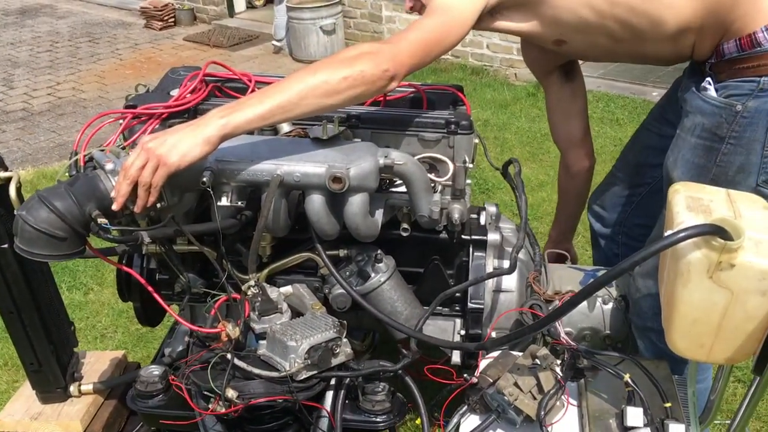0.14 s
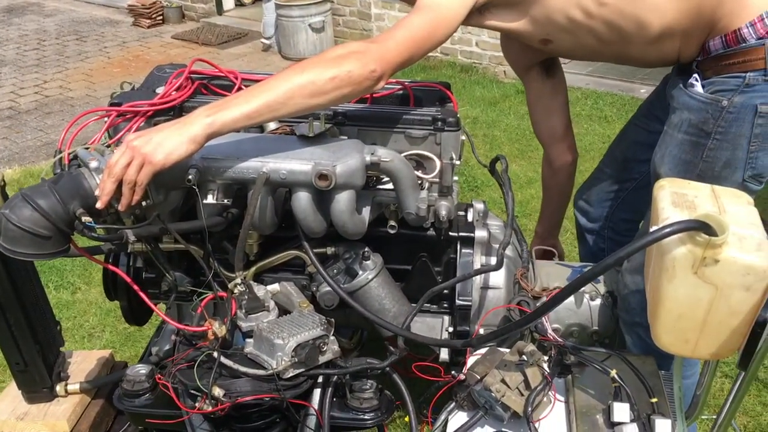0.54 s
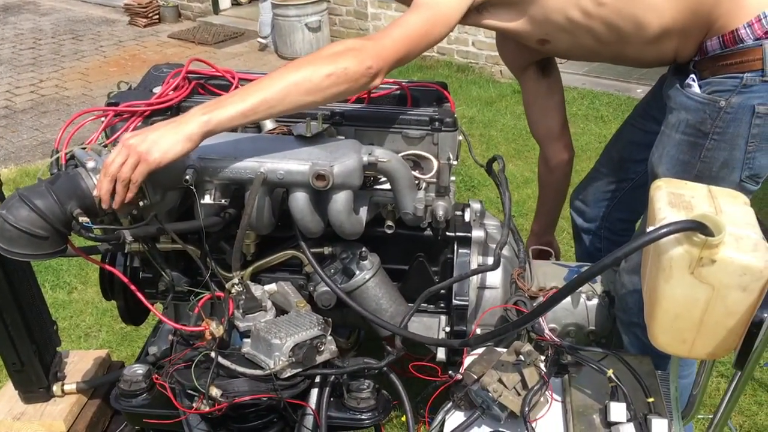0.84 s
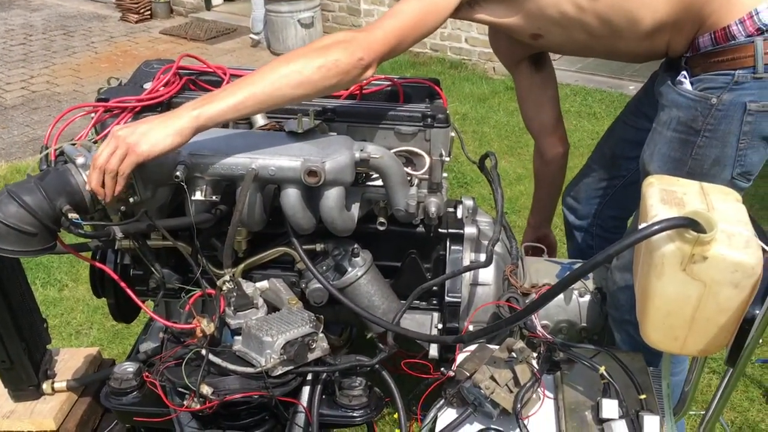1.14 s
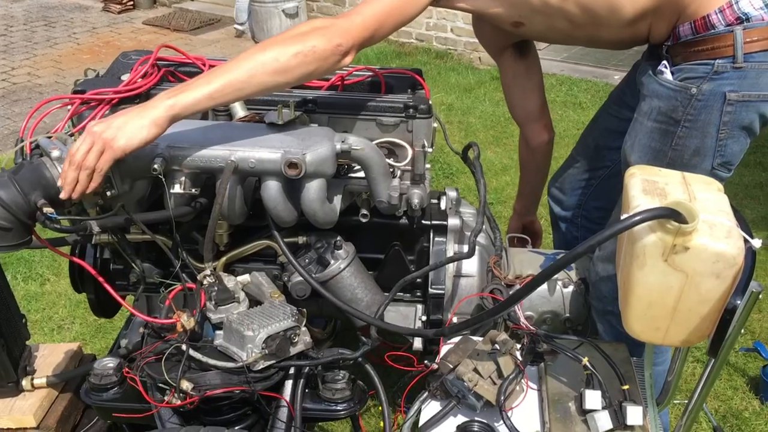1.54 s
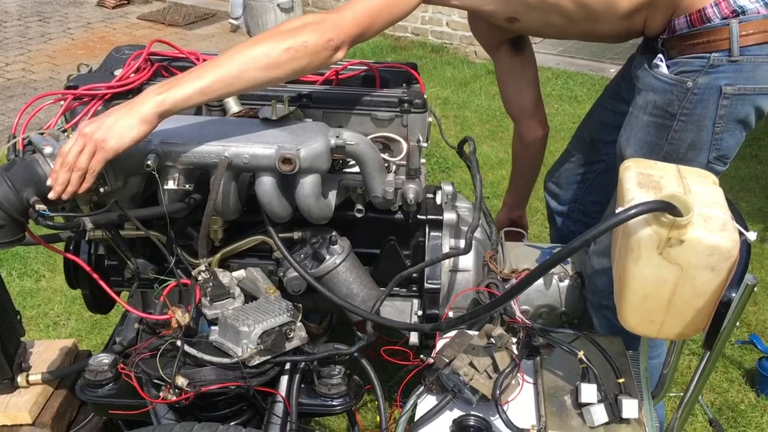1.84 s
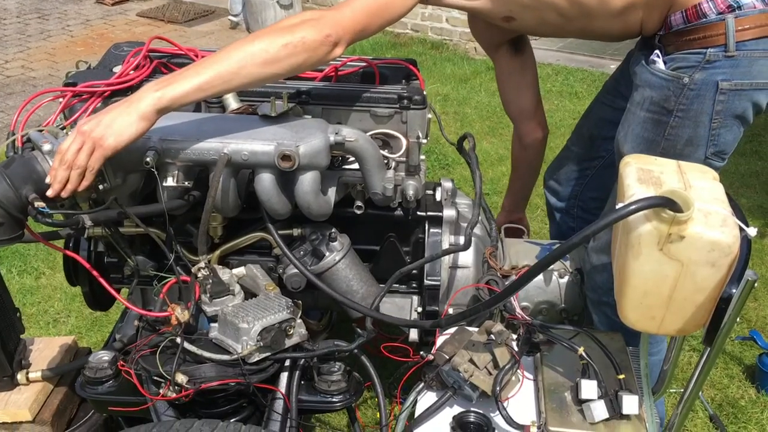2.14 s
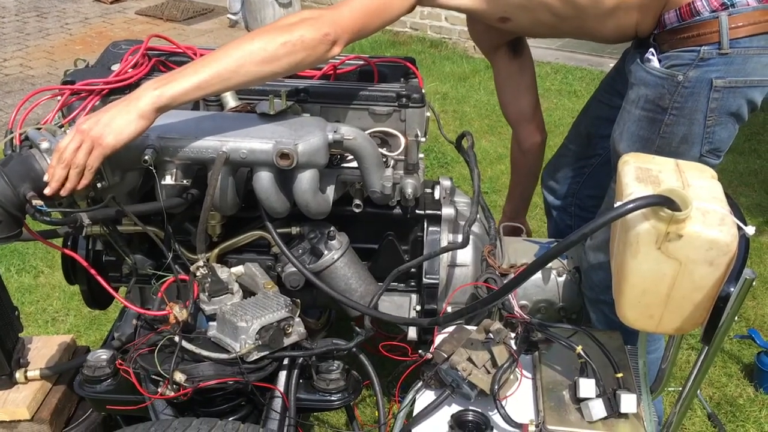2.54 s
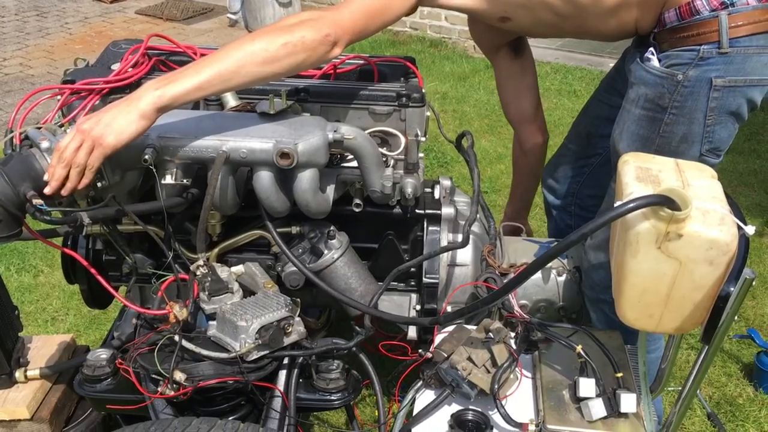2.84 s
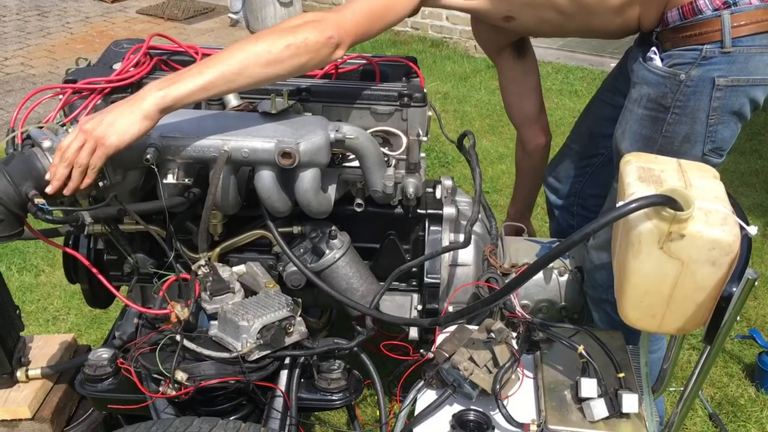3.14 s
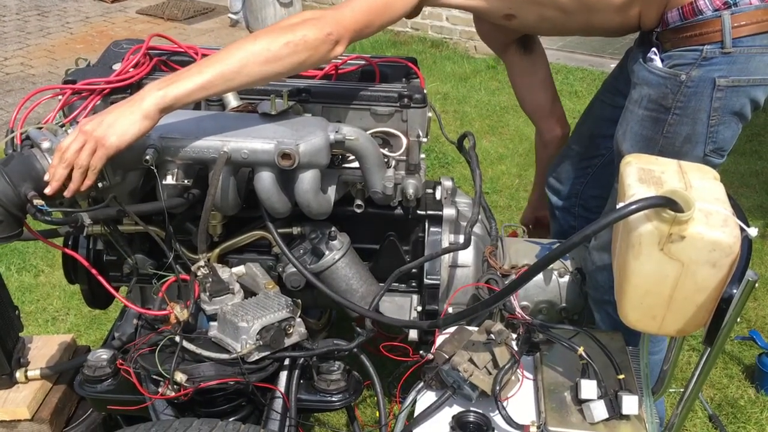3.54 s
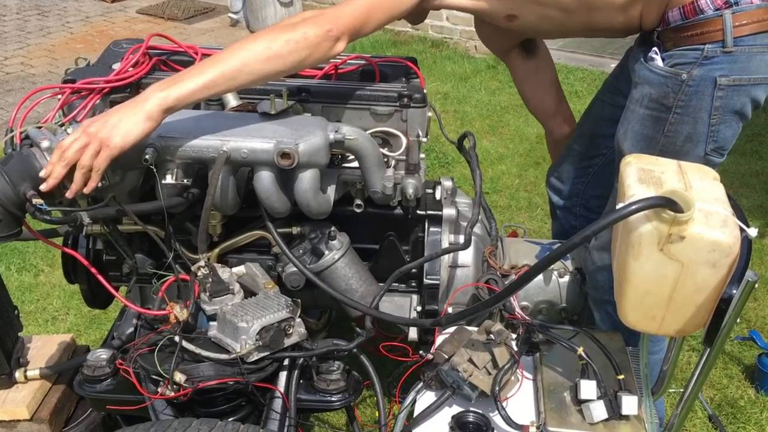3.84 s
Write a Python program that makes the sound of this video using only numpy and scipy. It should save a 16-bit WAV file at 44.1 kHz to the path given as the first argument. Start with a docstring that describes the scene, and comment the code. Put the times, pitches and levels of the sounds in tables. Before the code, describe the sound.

Close up outdoors, an unsilenced car engine rattles at an uneven idle, then gives one roaring rev. It coasts down, fires again briefly and dies, ending in a short squeak and a metallic clunk.

```python
"""A bare four-cylinder petrol engine idles raggedly on a lawn, close by, over a low outdoor rumble.
Every stroke thumps in the intake; firings crack, ring and whistle out of the unsilenced exhaust,
and some strokes misfire. At 1.3 s the throttle opens for one roaring rev, then the engine coasts.
It catches again at 2.3 s, loses its fire at 3.3 s and stalls. As it stops, a belt chirps and the
engine rocks back with a clunk."""
import sys
import numpy as np
from scipy import signal
from scipy.fft import rfft, irfft, next_fast_len
from scipy.io import wavfile

SR = 44100
rng = np.random.default_rng(int(sys.argv[2]) if len(sys.argv) > 2 else 0)


def wav_record(signal):
    """Record a signal, one row per channel, as 16-bit PCM in the file named by sys.argv[1]."""
    frames = np.transpose(np.atleast_2d(signal))
    bounded = np.clip(frames, -1, 1)
    # unit amplitude maps onto the largest positive 16-bit level
    quanta = np.round(bounded * 32767).astype(np.int16)
    wavfile.write(sys.argv[1], SR, quanta)


N = 176400
PUFF_FALL_S, SECOND_PUFF_S, SECOND_PUFF_DB = 0.005, .0125, -9.5  # exhaust puff and its weaker repeat


# Engine tempo: idle, rev, run-down (time [s], rate [strokes/s])
STROKE_RATE = [(0.0, 48.8), (0.45, 45.97), (0.8, 44.04), (1.08, 41.77), (1.3, 44.0), (1.42, 51.34),
               (1.53, 63.69), (1.7, 91.6), (1.79, 96.27), (1.9, 89.0), (2.05, 78.12), (2.32, 52.99),
               (2.55, 49.27), (2.8, 45.41), (3.15, 38.96), (3.33, 38.93), (3.5, 28.5), (3.8, 14.0)]
# Drive of the firings (time [s], level [dB])
FIRING_LEVEL = [(0, -0.5), (1.05, 0), (1.28, 2.5), (1.35, 4.5), (1.45, 6), (1.53, 4.5), (1.6, 4.5),
                (1.68, 0.5), (1.78, -9), (1.83, -20.5), (1.95, -25), (2.06, -29), (2.32, -47), (2.345, -7),
                (2.9, -1), (3.3, -3.5), (3.325, -25), (3.5, -44)]
# Accents: extra hard firings (time [s], level [dB])
ACCENTS = [(.077, 1.5), (.202, 3), (.459, 4.5), (.525, 3), (.57, 5.5), (.592, 2), (.701, 4.5), (.791, 4),
           (.86, 3.5), (.93, 5), (1.001, 3.5), (1.143, 4), (1.327, 3.5), (1.41, 6), (1.516, 5.5),
           (1.591, 8), (1.85, -7), (1.861, -3.5), (1.895, -7), (1.99, -10), (2.341, 1), (2.436, -5),
           (2.518, -1.5), (2.638, -0.5), (2.834, 0), (2.9, 3.5), (2.971, -1.5), (2.995, 0), (3.118, -3.5),
           (3.169, -1), (3.194, 3), (3.297, 1)]
# Dropped beats: strokes that fail to fire (time [s])
MISFIRE_TIMES = [.838, 1.12, 1.283, 1.305, 1.391, 1.5, 2.398, 2.417, 2.66, 2.923]
def strokes(start_phase=.23, failing_db=-10, misfire_db=-17.5):
    """The engine's rhythm: stroke times and firing levels in dB; weak firings are more uneven."""
    count = start_phase + np.cumsum(curve(STROKE_RATE)) / SR
    times = np.interp(np.arange(1, int(count[-1]) + 1), count, np.arange(N) / SR)
    power = curve(FIRING_LEVEL, times)
    scatter_db = 1.9 + 3 * np.clip(power / failing_db, 0, 1)
    db = power + scatter_db * rng.standard_normal(len(times))
    for s, accent_db in ACCENTS:
        db[np.argmin(abs(times - s))] = accent_db
    for s in MISFIRE_TIMES:
        db[np.argmin(abs(times - s))] += misfire_db
    return np.r_[0, times], np.r_[db[0], db]


# Throttle, the crossfade from crack to roar (time [s], opening [0-1])
THROTTLE_OPENING = [(1.28, 0.43), (1.34, 0.7), (1.42, 0.69), (1.52, 0.9), (1.6, 0.78), (1.8, 0.93),
                    (2.05, 0.67), (2.33, 0.04)]
# EQ of the bright closed-throttle crack (frequency [Hz], level [dB])
CRACK_EQ = [(260, -45), (450, -10), (538, -6), (589, -29), (684, -8), (794, -12.5), (868, -6), (993, -15),
            (1150, -8), (1420, -33.5), (1560, -12), (1830, -15), (1980, -38), (2130, -7.5), (2910, 0),
            (3330, -3), (3700, -2.5), (5220, -6.5), (6240, -7), (7580, -8), (9070, 2), (9630, 7.5),
            (10500, -4), (14600, -13.5), (16000, -19)]
# EQ of the broad open-throttle roar (frequency [Hz], level [dB])
ROAR_EQ = [(240, -32), (400, -10), (536, 0.5), (588, -6), (979, -8.5), (1600, -4), (2020, -5.5), (2930, -4),
           (3420, -10), (4180, -3), (4880, -13), (5520, -5.5), (9760, -13), (15300, -17.5), (16000, -37)]
def exhaust(times, db, crack_db=-21.5, roar_db=-17, rise_s=0.0014, lead_s=0.0031, jitter_s=0.00078):
    """A crack of gas per firing with a weaker second puff; an open throttle turns it into a roar."""
    t = np.arange(SR // 10) / SR
    onsets = times - lead_s + jitter_s * rng.standard_normal(len(times))
    opening = curve(THROTTLE_OPENING, times)
    tail = amp(-14.5) * burst(t, rise_s, 0.035)
    crack = retrigger(puffs(t, rise_s, PUFF_FALL_S) + tail, onsets, amp(db + crack_db) * (1 - opening))
    roar = retrigger(burst(t, rise_s, 0.0061), onsets, amp(db + roar_db) * opening)
    return crack * noise(CRACK_EQ) + roar * noise(ROAR_EQ)


# Ringing modes of the exhaust ports (frequency [Hz], level [dB], decay [s])
PORT_MODES = [(1200, -34, .011), (1580, -27, .012), (1820, -31, .01), (2200, -31, .009), (2880, -26, .008),
              (3680, -22, .006), (4150, -23, .007), (4600, -28, .006), (6200, -26, .005)]
# Each cylinder's own voice (pitch [ratio], level [dB])
CYLINDER_VOICES = [(1.0, 0), (.95, -3), (1.03, -0.5), (1.06, -4)]
def ports(times, db, throttle_db=-6, rise_s=0.0015, spread=0.0363, sag=0.045, rough=.04, scatter_db=4.5):
    """Each firing rings its cylinder's ports, slightly detuned; the pitch sags as the pressure falls."""
    out, t = np.zeros(N), np.arange(SR // 20) / SR
    hz, mode_db, decays = np.transpose(PORT_MODES)
    envelopes = np.array([burst(t, rise_s, decay) for decay in decays])
    bend = 1 + sag * (np.exp(-t / PUFF_FALL_S) - .5)
    levels = db + throttle_db * curve(THROTTLE_OPENING, times)
    for k, (s, level) in enumerate(zip(times, levels)):
        tuning, cylinder_db = CYLINDER_VOICES[k % len(CYLINDER_VOICES)]
        detune, scatter = rng.standard_normal((2, len(hz)))
        pitch = np.outer(tuning * hz * (1 + spread * detune), bend)
        phase = np.cumsum(2 * np.pi * pitch / SR + rough * rng.standard_normal(pitch.shape), axis=1)
        gains = amp(level + cylinder_db + mode_db + scatter_db * np.minimum(scatter, 1))
        add(out, s, gains @ (envelopes * np.sin(phase)))
    return out


# Centre pitch of the valve whistle (time [s], pitch [Hz])
WHISTLE_PITCH = [(0, 9770), (1.1, 9410), (2.5, 9130), (3.3, 9380)]
def whistle(times, db, rough=0.18, spread=.042, sag=.1, scatter_db=2.5, lead_s=.0005):
    """Gas squeals through each opening exhaust valve, most on hard firings at a closed throttle."""
    out, t = np.zeros(N), np.arange(SR // 30) / SR
    envelope = puffs(t, rise_s=0.0021, fall_s=.003)
    bend = sag * (np.exp(-t / PUFF_FALL_S) - .5)
    levels = -16.5 + 1.4 * db - 22 * curve(THROTTLE_OPENING, times)
    for s, level, hz in zip(times, levels, curve(WHISTLE_PITCH, times)):
        pitch = hz * (1 + spread * rng.standard_normal() + bend)
        phase = np.cumsum(2 * np.pi * pitch / SR + rough * rng.standard_normal(len(t)))
        add(out, s - lead_s, amp(level + scatter_db * rng.standard_normal()) * envelope * np.sin(phase))
    return out


# Weight of the intake suction (time [s], level [dB])
SUCTION_LEVEL = [(0, -0.5), (1.28, 0), (1.45, 2.5), (1.6, 2), (1.7, -3.5), (1.8, 2.5), (2.05, -5),
                 (2.3, -2.5), (2.6, -2), (3.3, -0.5), (3.36, -5.5), (3.6, 1.5), (3.7, 2), (3.745, -3),
                 (3.79, 7), (3.85, -0.5), (3.9, -22)]
# EQ of a fired stroke's deep boom (frequency [Hz], gain [dB])
FIRED_EQ = [(20, -14), (45, -12), (70, 4), (90, 2), (125, -2), (170, 8), (195, 2), (230, -15.5), (280, -3),
            (330, -15), (420, -27.5), (800, -58), (2000, -96)]
# EQ of a coasting stroke's lighter thump (frequency [Hz], gain [dB])
COASTING_EQ = [(20, -66), (50, -6), (80, 1.5), (120, 1.5), (160, 10.5), (195, -11), (230, -14.5),
               (285, -11), (340, -18.5), (420, -45), (800, -24), (2000, -101)]
def intake(times, db, fired_above_db=-10, scatter_db=.8, lag_s=0.00611, boom_db=36, coast_db=31):
    """Each stroke gulps at the manifold, softer when slow; fired ones boom deeper, and the air churns."""
    size_scatter, time_scatter = rng.standard_normal((2, len(times)))
    fired = 1 / (1 + amp(2 * (fired_above_db - db)))  # 0 coasting, 1 fired
    sizes = -amp(curve(SUCTION_LEVEL, times) + scatter_db * size_scatter)
    jitter_s = fired * .00025 + (1 - fired) * .0007
    onsets = times + lag_s + jitter_s * time_scatter
    t = np.arange(-SR // 200, SR // 200) / SR
    booms, coasts = np.zeros(N), np.zeros(N)
    for s, size, share, rate in zip(onsets + t[0], sizes, fired, curve(STROKE_RATE, times)):
        gulp = np.exp(-.5 * (t * rate / 0.031) ** 2)  # about 3% of a stroke wide
        gulp *= size / gulp.sum()
        add(booms, s, share * gulp)
        add(coasts, s, (1 - share) * gulp)
        add(coasts, s + 0.506 / rate, 0.44 * (1 - share) * gulp)  # rebound, half a stroke later
    thumps = amp(boom_db) * colour(booms, FIRED_EQ) + amp(coast_db) * colour(coasts, COASTING_EQ)
    return thumps + churn(onsets)


# EQ of the low manifold turbulence (frequency [Hz], level [dB])
CHURN_EQ = [(20, -35), (60, -15), (110, -7), (170, 0), (215, -7), (280, -7), (350, -17), (450, -28),
            (2000, -70)]
def churn(onsets, level_db=-26, scatter_db=4, idle_rate=33.4):
    """Air churns in the manifold, lumpy from stroke to stroke, and dies away below idle speed."""
    lumps_db = curve(np.c_[onsets, scatter_db * rng.standard_normal(len(onsets))])
    flow = np.minimum(curve(STROKE_RATE) / idle_rate, 1) ** 3.2
    return amp(level_db + curve(SUCTION_LEVEL) + lumps_db) * flow * noise(CHURN_EQ)


# Belt squeaks at the stall (time [s], length [s], start pitch [Hz], end pitch [Hz], level [dB])
BELT_CHIRPS = [(3.655, 0.063, 630, 520, -40), (3.793, .05, 9650, 8260, -27.5),
               (3.785, 0.063, 5870, 4900, -31.5)]
def belt(rough=.16):
    """The belt chirps downward as the pulleys stop."""
    out = np.zeros(N)
    for s, length, start_hz, end_hz, db in BELT_CHIRPS:
        progress = np.linspace(0, 1, int(length * SR))
        glide = start_hz + (end_hz - start_hz) * progress ** 3
        pitch = glide * (1 + rough * rng.standard_normal(len(glide)))
        add(out, s, amp(db) * np.sin(np.pi * progress) * np.sin(2 * np.pi * np.cumsum(pitch) / SR))
    return out


# Short metallic modes of the clunk (frequency [Hz], level [dB], decay [s])
CLUNK_MODES = [(730, -3.5, 0.024), (1070, -13, 0.015), (1140, -9, 0.017), (1600, -6, 0.011),
               (2260, -13, 0.0059), (4100, -12, 0.0043)]
def clunk(at_s=3.873, level_db=-33.5, rise_s=0.01, rough=0.069):
    """The stalled block rocks back and rings briefly."""
    out, t = np.zeros(N), np.arange(SR // 10) / SR
    for hz, db, decay in CLUNK_MODES:
        phase = 2 * np.pi * hz * t + rough * np.cumsum(rng.standard_normal(len(t)))
        add(out, at_s, amp(level_db + db) * burst(t, rise_s, decay) * np.sin(phase))
    return out


# Fader ride of the engine's air noise (time [s], level [dB])
AIR_FADER = [(0, -37), (1.3, -35.5), (1.7, -26.5), (2.05, -40.5), (2.3, -43.5), (3.3, -39.5), (3.45, -44.5),
             (3.78, -40.5), (3.85, -44.5), (3.9, -54.5), (4, -49)]
# EQ of that airy hiss (frequency [Hz], level [dB])
AIR_EQ = [(260, -9), (450, -24), (572, -10.5), (635, -4.5), (737, -8.5), (771, -17), (908, -8.5),
          (1300, -7), (1440, -16), (1560, -6), (1950, -10.5), (2040, -12), (2160, -8.5), (2910, -6),
          (3810, -10), (4910, -15), (5220, -14), (6830, -11), (8170, -21.5), (8930, -11.5), (10500, -25),
          (11300, -21), (16000, -33)]
def air(flutter_db=1.0):
    """Air rushes around the turning engine and flutters at the stroke rate."""
    flutter = flutter_db * np.cos(2 * np.pi * np.cumsum(curve(STROKE_RATE)) / SR)
    return amp(curve(AIR_FADER) + flutter) * noise(AIR_EQ)


# EQ of the outdoor bed (frequency [Hz], level [dB])
RUMBLE_EQ = [(15, -30), (50, -35), (110, 4), (170, -0.5), (250, -13), (400, -23.5), (1000, -22),
             (6000, -47), (16000, -52)]
def rumble(level_db=-43):
    """A low, steady outdoor background."""
    return amp(level_db) * noise(RUMBLE_EQ)


def yard(x, wet_db=-9.5, decay_s=0.0092):
    """Adds a short scatter of reflections from the frame, ground and wall."""
    t = np.arange(SR // 5) / SR
    tail = rng.standard_normal(len(t)) * burst(t, 0.0015, decay_s)
    return x + amp(wet_db) * signal.fftconvolve(x, tail / np.linalg.norm(tail))[:N]


def amp(db):
    """Decibels to gain."""
    return 10 ** (np.asarray(db) / 20)


def curve(rows, at=None):
    """A control curve at given times, or at every sample."""
    return np.interp(np.arange(N) / SR if at is None else at, *np.transpose(rows))


def colour(x, points):
    """Minimum-phase EQ through (frequency [Hz], gain [dB]) points."""
    m = 2 * next_fast_len(N // 2 + SR // 4)
    hz, db = np.transpose(points)
    gain = amp(np.interp(np.log(np.fft.rfftfreq(m, 1 / SR) + 1), np.log(hz + 1), db))
    cepstrum = irfft(np.log(gain), m)
    cepstrum[1:m // 2] *= 2
    cepstrum[m // 2 + 1:] = 0
    return irfft(rfft(x, m) * np.exp(rfft(cepstrum)), m)[:N]


def noise(points):
    """Coloured noise of rms 1."""
    x = colour(rng.standard_normal(N), points)
    return x / np.sqrt(np.mean(x ** 2) + 1e-20)


def retrigger(envelope, times, gains):
    """Start the envelope at each time, with its own gain."""
    samples = np.clip(np.round(times * SR), 0, N).astype(int)
    return signal.fftconvolve(np.bincount(samples, gains, N + 1)[:N], envelope)[:N]


def burst(t, rise_s, fall_s):
    """Soft attack and exponential decay, peak 1."""
    t = np.maximum(t, 0)
    shape = (1 - np.exp(-(t / rise_s) ** 2)) * np.exp(-t / fall_s)
    return shape / shape.max()


def puffs(t, rise_s, fall_s):
    """Envelope of an exhaust puff and its weaker repeat."""
    return burst(t, rise_s, fall_s) + amp(SECOND_PUFF_DB) * burst(t - SECOND_PUFF_S, rise_s, fall_s)


def add(track, s, sound):
    """Mix a sound in at s seconds."""
    part = track[max(0, round(s * SR)):][:len(sound)]
    part += sound[:len(part)]


def scene():
    """Mono mix: the bright layers with reflections, the intake dry, air and rumble underneath."""
    times, db = strokes()
    bright = exhaust(times, db) + ports(times, db) + whistle(times, db) + belt() + clunk()
    return (yard(bright) + intake(times, db) + air() + rumble())[None]


def record(dry, hardness=8, low_cut_hz=33, top_hz=16150):
    """The microphone rounds the highest peaks and keeps nothing outside its band."""
    rounded = dry / (1 + abs(dry) ** hardness) ** (1 / hardness)
    m = next_fast_len(N + SR // 2)
    hz = np.fft.rfftfreq(m, 1 / SR)
    low_cut = 1 - 1 / (1 + (hz / low_cut_hz) ** 10)
    return irfft(rfft(rounded, m) * low_cut * (hz < top_hz), m)[..., :N]


dry = scene()
out = record(dry)
wav_record(out)
```